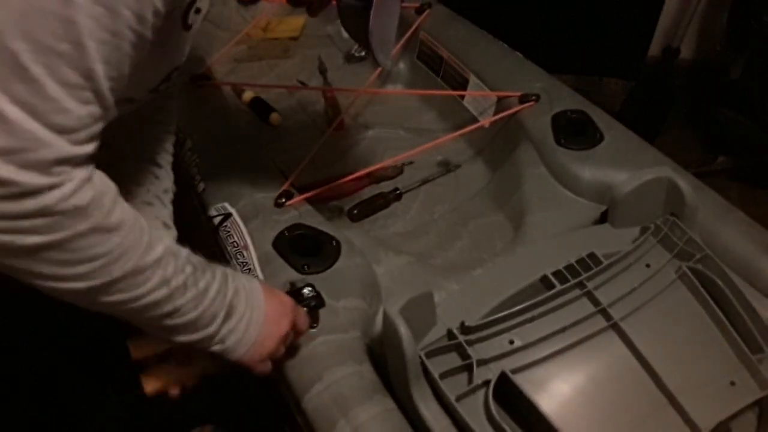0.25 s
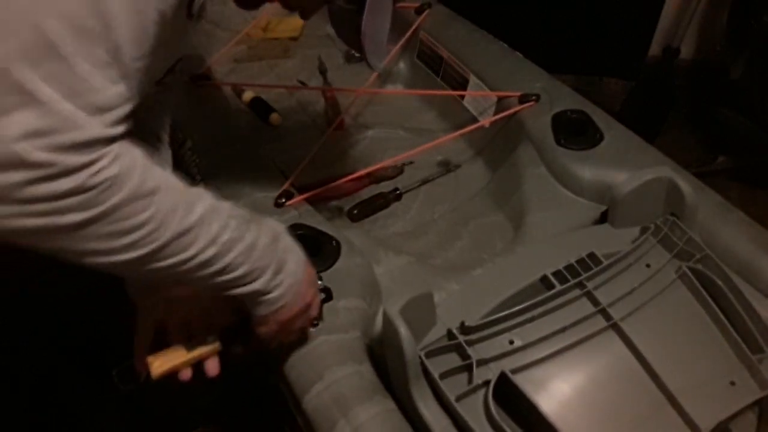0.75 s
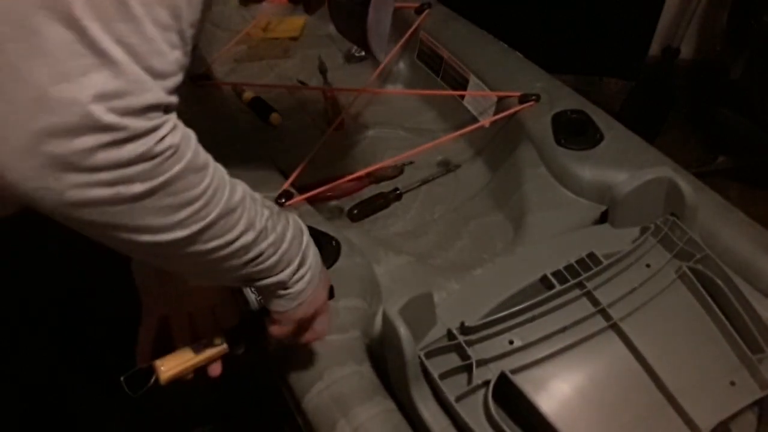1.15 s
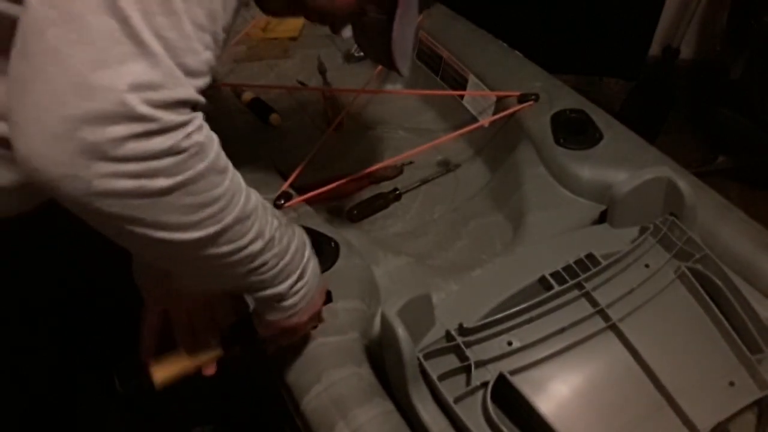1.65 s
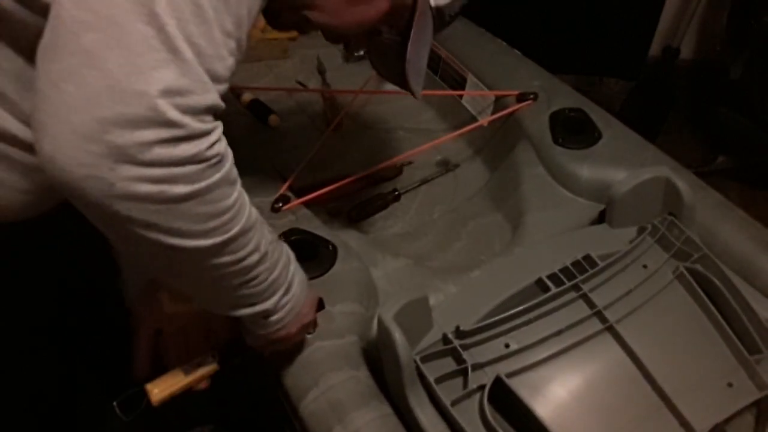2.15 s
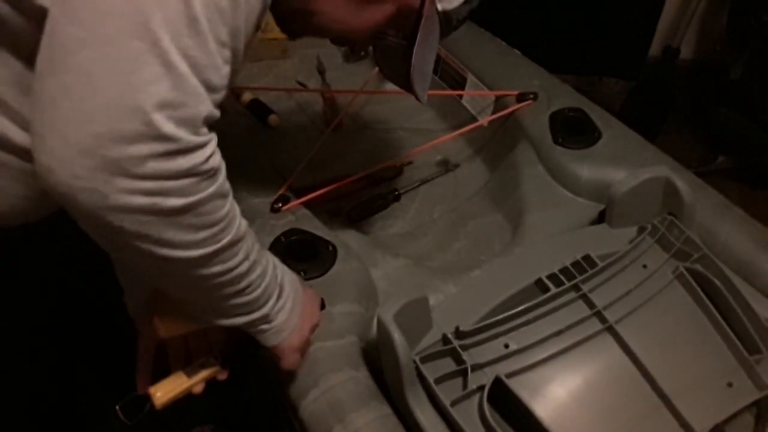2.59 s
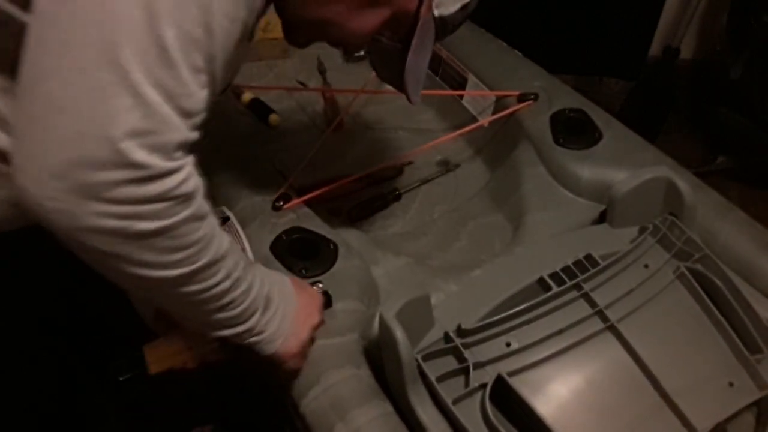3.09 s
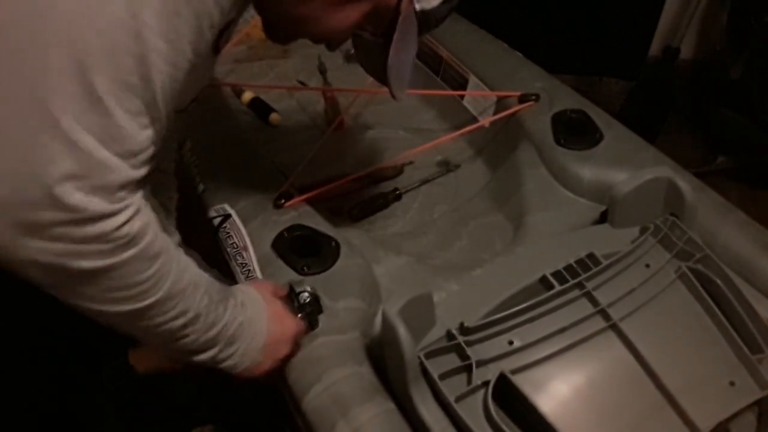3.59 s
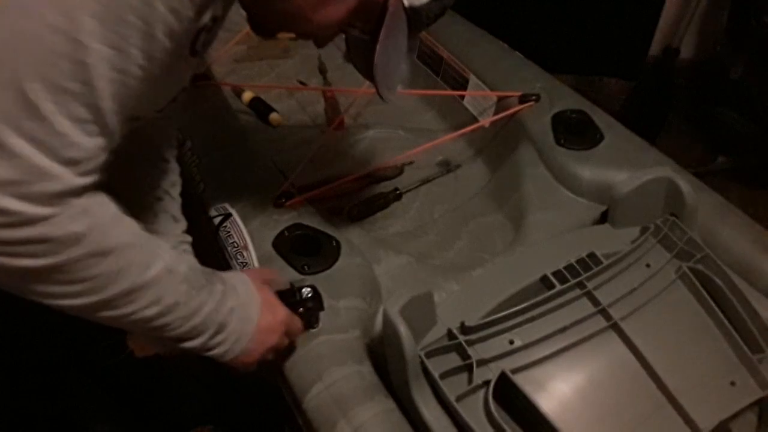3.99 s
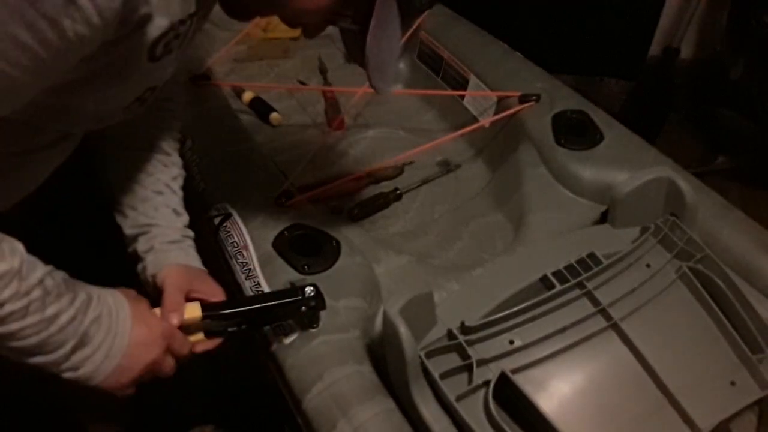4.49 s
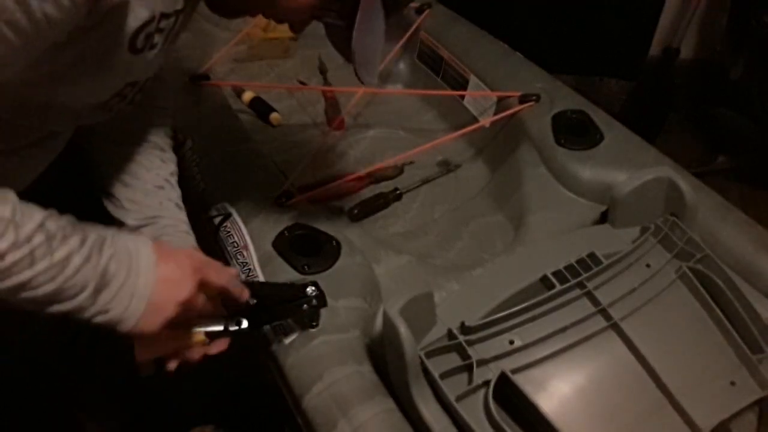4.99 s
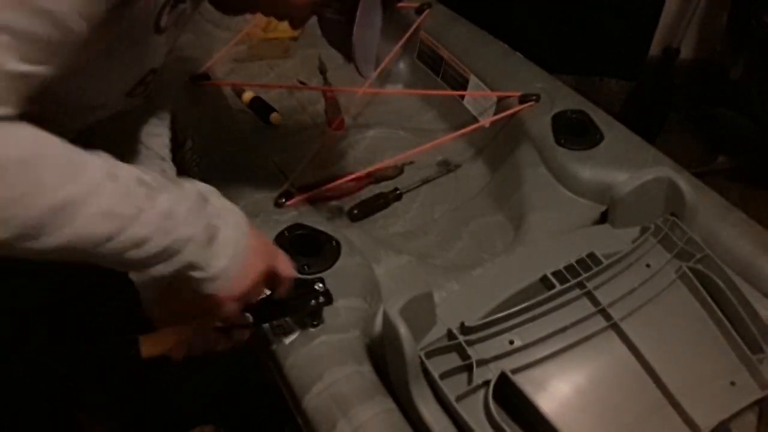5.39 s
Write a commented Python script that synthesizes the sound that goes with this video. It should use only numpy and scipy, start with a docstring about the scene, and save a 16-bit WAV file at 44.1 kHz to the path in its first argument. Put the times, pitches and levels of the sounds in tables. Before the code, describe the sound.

A hand rivet gun clicks, then snaps a rivet with a hollow plastic boom; the steel stem drops and rings amid soft rustles.

```python
"""Hand riveting a plastic kayak hull.

In a small workshop the rivet gun's jaws and handles click, the rivet stem snaps and the hollow hull
booms. Later the spent steel stem drops, rings and bounces. Sleeves rustle over the room's air.
Soft low bumps reach the two microphone ports; the right port is muffled and the electronics hiss."""
import sys
import numpy as np
from scipy import signal
from scipy.fft import rfft, irfft, next_fast_len
from scipy.io import wavfile
from scipy.ndimage import uniform_filter1d, map_coordinates

SR = 44100
rng = np.random.default_rng(int(sys.argv[2]) if len(sys.argv) > 2 else 0)


def output_pcm(signal):
    """Save a mono or channel-first signal as 16-bit PCM at the path in sys.argv[1].

    Samples are clipped to [-1, 1] before scaling.
    """
    pcm = np.clip(np.atleast_2d(signal).T, -1, 1) * 32767
    wavfile.write(sys.argv[1], SR, np.round(pcm).astype(np.int16))


N = 249165
CLOCK_S = np.arange(N) / SR
EVENT_S = np.arange(int(.7 * SR)) / SR

# Room decay: freq_hz, t60_s
ROOM_DECAY = [(100, 0.61), (400, 0.3), (1000, 0.51), (3000, 0.39), (8000, 0.44), (15000, 0.27)]
# Left-right likeness of diffuse sound: freq_hz, correlation
PORT_COHERENCE = [(60, 0.97), (150, 0.84), (300, 0.84), (640, 0.31), (1400, -0.37), (3000, 0.046)]
# Responses of the right port and of both ports: freq_hz, gain_db
RIGHT_MUFFLE = [(100, 1), (400, -4), (700, -2.5), (1300, -12.5), (2400, -13.5), (4400, -20), (8000, -38),
                (15000, -21)]
PORT_LOW_CUT = [(15, -22), (30, -12), (50, -1.5), (70, -0.5)]

# Noise spectra: freq_hz, level_db
HISS_SPECTRUM = [(1000, 11.5), (4000, 3.5), (6000, 0), (11000, 0.5), (13000, 6), (14500, 6.5), (16000, 0.5)]
FIZZ_SPECTRUM = [(5000, -35), (7000, -7), (8300, 3.5), (10000, 0.5), (11500, 0), (12600, -24), (13600, 4),
                 (15500, -10)]
AIR_SPECTRUM = [(30, -11), (100, 1.5), (200, -3), (370, -1.5), (600, -6), (1000, -15.5), (1600, -17.5),
                (2500, -33), (4000, -41), (8000, -51.5)]
RUMBLE_SPECTRUM = [(20, -41), (45, -21.5), (90, 0), (140, -5), (250, -14.5), (500, -43), (1500, -64.5)]
CLOTH_SPECTRUM = [(100, 8.5), (300, 5.5), (700, -4.5), (1500, -9.5), (3000, -27), (8000, -50), (16000, -45)]
# Stronger fizz: start_s, end_s
FIZZ_SPANS = [(.07, .15), (.66, 0.75), (1.23, 1.61), (2.47, 2.93)]
# Stronger rumble: start_s, end_s, boost_db
RUMBLE_FLURRIES = [(.08, 0.93, 6.5), (1.043, 1.956, 9.5), (2.42, 3.023, 9.5), (3.892, 4.09, 6),
                   (4.964, 5.2, 5.5), (5.43, 5.7, 9)]
# Loud low bumps: centre_s, level_db, pitch_hz, port (0 left, 1 right)
LOUD_BUMPS = [(0.118, -16.5, 198, 0), (.84, -19.5, 171, 0), (1.596, -17.5, 160, 0), (2.452, -21.5, 218, 0),
              (2.501, -15, 119, 0), (2.567, -19.5, 144, 0), (2.852, -24, 197, 0), (2.903, -20, 220, 0),
              (2.983, -23, 120, 0), (3.313, -22, 131, 0), (3.539, -27, 119, 1), (4.032, -23, 143, 0),
              (4.601, -24, 129, 0), (5.003, -26.5, 139, 0), (5.455, -20, 148, 0)]
# Sleeve swells: centre_s, level_db, half_length_s
SLEEVE_RUSTLES = [(0.164, -46.5, 0.044), (0.853, -55, 0.033), (2.427, -55, 0.26), (2.878, -46, 0.034),
                  (4.427, -55.5, 0.24), (5.076, -50, 0.087), (5.538, -52.5, 0.073)]

# Impact spectra: freq_hz, level_db
THUD_SPECTRUM = [(30, -44), (60, -31), (90, -11.5), (170, -7), (260, -1.5), (350, 1.5), (520, 0), (640, -9),
                 (760, -9.5), (900, -21.5), (2000, -49), (6000, -84)]
CRACK_SPECTRUM = [(200, -13), (700, 3.5), (1200, 7), (2400, 2.5), (3400, -2.5), (4800, -4.5), (6500, -12.5),
                  (8000, -9.5), (10000, -21), (16000, -20.5)]
TICK_SPECTRUM = [(300, -11), (1000, 1), (1600, -1.5), (3000, -9), (4000, -2), (7500, -8.5), (9000, -9),
                 (13000, -22), (16000, -4)]
LANDING_SPECTRUM = [(200, 3), (700, -12.5), (1400, 8), (2700, 0), (4500, 0), (8500, -1), (11000, -8),
                    (16000, -1.5)]
# Resonances of jaws, handles, gun nose on hull and landing surface: freq_hz, energy_db, t60_s
JAW_MODES = [(1515, -0.5, 0.02), (2100, 4.5, 0.022), (2260, 0.5, 0.0091), (2690, -1.5, 0.015),
             (3010, 0.5, 0.012), (3440, -10, 0.0065), (4610, -1, .012), (5090, -1, 0.025),
             (5780, -0.5, 0.0051), (7150, 3, 0.0067), (7700, 1, 0.01), (8340, -2.5, 0.0067),
             (12500, -9.5, .008)]
HANDLE_MODES = [(1480, -11, 0.037), (1610, -9.5, 0.045), (2061, 1, 0.04), (2118, -3, 0.035),
                (3050, -15.5, 0.0099), (4010, -20.5, 0.021), (7660, -28.5, 0.012)]
NOSE_MODES = [(810, 3, 0.01), (1045, -2, 0.013), (1479, -0.5, 0.032), (1664, -0.5, 0.018),
              (1950, -3.5, 0.013), (2225, -6.5, 0.049), (2770, -8.5, 0.0063), (3130, -5.5, 0.015),
              (3484, -14.5, 0.03)]
SURFACE_MODES = [(823, -3.5, 0.022), (987, 3.5, 0.025), (1350, 7.5, 0.0052), (1680, 4.5, 0.013),
                 (2500, 0.5, 0.011), (2910, 2, 0.0095), (4420, -4.5, 0.0076), (4830, -6.5, 0.0066)]
# Jaws release the stem or slip on it: start_s, level_db, tilt_db_per_octave
JAW_SLIPS = [(0.465, -57, 10), (1.0468, -39, -0.5), (1.313, -57.5, 10), (4.013, -58.5, 5),
             (4.9117, -56.5, -8.5), (5.2739, -63, -6)]
# Handles reach their stops: start_s, level_db, tilt_db_per_octave
HANDLE_STOPS = [(.4643, -60.5, -13), (2.364, -57, -4), (4.7975, -36, 2.5)]
# Nose shifts against the hull: start_s, clack_db, tilt_db_per_octave, thud_db
NOSE_SHIFTS = [(0.1372, -50, -6, -43), (2.3437, -54, -4, -64), (2.465, -51, -6.5, -57),
               (2.894, -38.5, 0.5, -42.5), (2.912, -40, -2.5, -41), (4.37, -51.5, -5, -73),
               (5.0638, -62, -5, -72)]

# Steel stem resonances: freq_hz, struck_at_tip_db, struck_at_middle_db, t60_s
STEM_MODES = [(2374, -17, -16, .28), (4183, -18, -17, .22), (5891, -14, -5, .33), (8565, -19, -20, .28),
              (9868, -1, -12, .32), (12020, -22, -8, .19), (13484, -1, 0, .2)]
# Stem landings: start_s, clack_db, tick_db, ring_db, strike_point (0 tip, 1 middle)
STEM_LANDINGS = [(3.0074, -29.5, -33.5, -37, 0.29), (3.021, -46, -43, -42, 0.2),
                 (3.051, -48, -38.5, -47, 0.8), (3.0924, -35.5, -34, -34.5, 1)]
# Stem gives, breaks, gun recoils: start_s, thud_db, clack_db, crack_db, first_gap_s, rebound_loss_db
SNAP_JOLTS = [(1.6636, -22.5, -44.5, -48.5, .009, 5), (1.692, -11.5, -19.5, -27, 0.0084, 2.5),
              (1.735, -12.5, -26.5, -22.5, .013, 8.5)]
# Hollow hull resonances: freq_hz, level_db, t60_s, swell_s
HULL_MODES = [(92, -34, .7, .06), (129, -16.5, .36, .02), (146, -28, .45, .05), (212, -21, .33, .03),
              (252, -15, .22, .03), (305, -16, .3, .025), (350, -4, .19, .016), (393, -9, .23, .03),
              (419, -10, .23, .03), (521, -1, .25, .06), (549, -14, .25, .04), (611, -23, .27, .03),
              (659, -22, .28, .03), (745, -21, .32, .04), (865, -34, .45, .04), (1164, -30, .3, .025),
              (1503, -23, .3, .025), (1873, -26, .22, .05)]
# Hull springs as the stem gives and breaks: start_s, level_db
HULL_BOOMS = [(1.661, -13.5), (1.6917, 0)]


def amp(db):
    """Decibels to gain."""
    return 10 ** (np.asarray(db) / 20)


def unit_rms(x):
    """Scale to rms 1."""
    return x / np.sqrt(np.mean(x ** 2) + 1e-20)


def unit_burst(x):
    """Scale to the energy of 10 ms at rms 1."""
    return x / np.linalg.norm(x) * np.sqrt(SR / 100)


def curve_at(points, hz):
    """Interpolate on a log frequency axis."""
    knots_hz, values = np.transpose(points)
    return np.interp(np.log(hz + 1), np.log(knots_hz + 1), values)


def add(track, start_s, x):
    """Mix x into the track."""
    start = max(round(start_s * SR), 0)
    track[..., start:start + x.shape[-1]] += x[..., :N - start]


def colour(x, spectrum):
    """Filter by a (freq_hz, gain_db) curve."""
    size = next_fast_len(x.shape[-1] + 8192)
    gain = amp(curve_at(spectrum, np.fft.rfftfreq(size, 1 / SR)))
    return irfft(rfft(x, size) * gain, size)[..., :x.shape[-1]]


def gate(start_s, end_s, ramp_s):
    """Trapezoid from 0 to 1 and back."""
    return np.clip(np.minimum(CLOCK_S - start_s, end_s - CLOCK_S) / ramp_s + .5, 0, 1)


def wobble(knots_per_s):
    """Smooth random curve."""
    return map_coordinates(rng.standard_normal(256), [EVENT_S * knots_per_s], mode="mirror")


def diffuse_noise(size):
    """Noise from all around: alike at both ports in the bass, unrelated in the treble."""
    coherence = curve_at(PORT_COHERENCE, np.fft.rfftfreq(size, 1 / SR))
    angle = np.arccos(np.clip(coherence, -1, 1)) / 2
    mid, side = irfft(rfft(rng.standard_normal((2, size))) * [np.cos(angle), np.sin(angle)], size)
    return np.array([mid + side, mid - side])


def impact(spectrum, size=4096):
    """Minimum-phase pulse with the given spectrum."""
    cepstrum = irfft(np.log(amp(curve_at(spectrum, np.fft.rfftfreq(size, 1 / SR)))))
    cepstrum[1:size // 2] *= 2
    cepstrum[size // 2 + 1:] = 0
    pulse = irfft(np.exp(rfft(cepstrum)))
    return unit_burst(np.pad(pulse, (0, len(EVENT_S) - size)))


def ring(hz, t60_s):
    """One decaying mode."""
    return np.sin(2 * np.pi * hz * EVENT_S) * amp(-60 * EVENT_S / t60_s)


def struck(modes, tilt_db_per_octave=0):
    """Short resonances excited together, alternating in sign."""
    return unit_burst(sum(
        (-1) ** k * amp(db + tilt_db_per_octave * np.log2(hz / SR)) * ring(hz, t60_s) / np.sqrt(t60_s)
        for k, (hz, db, t60_s) in enumerate(modes)))


def in_room(x, wet_db, t60_scale=1, build_s=.0013):
    """Direct sound, then a dense tail from hull and walls."""
    hz, time_s, noise = signal.stft(diffuse_noise(len(EVENT_S)), SR, nperseg=256)
    decay = amp(-60 * time_s / (t60_scale * curve_at(ROOM_DECAY, hz)[:, None]))
    response = signal.istft(noise * decay, SR, nperseg=256)[1][:, :len(EVENT_S)]
    response *= 1 - np.exp(-EVENT_S / build_s)
    response *= amp(wet_db) / np.linalg.norm(response[0])
    response[0, 0] += 1
    response[1, 3] += 1  # direct sound, 3 samples later on the right
    return signal.fftconvolve(x[None], response, axes=1) / np.hypot(1, amp(wet_db))


def microphone_hiss(hiss_db=-72, fizz_db=-71, step_db=4):
    """Even electronic hiss, plus a high fizz on the left that steps up in spells."""
    hiss = amp(hiss_db) * unit_rms(colour(rng.standard_normal((2, N)), HISS_SPECTRUM))
    spells = sum(gate(start_s, end_s, ramp_s=.03) for start_s, end_s in FIZZ_SPANS)
    fizz = unit_rms(colour(rng.standard_normal(N), FIZZ_SPECTRUM))
    hiss[0] += amp(fizz_db + step_db * spells) * fizz
    return hiss


def room_air(level_db=-51):
    """Steady diffuse murmur of air."""
    return amp(level_db) * unit_rms(colour(diffuse_noise(N), AIR_SPECTRUM))


def port_bumps(calm_db=-57.5, lump_db=4, small_count=44, small_hz=129, width_cycles=.41, lead_s=.03):
    """Brief pressure swings at either port over a lumpy rumble; flurries lift rumble and small bumps."""
    flurry_db = sum(db * gate(start_s, end_s, ramp_s=.047) for start_s, end_s, db in RUMBLE_FLURRIES)
    bed_db = calm_db + flurry_db
    slow_noise = colour(rng.standard_normal((2, N)), [(1, -1), (25, 12.5), (70, -49), (200, -120)])
    lumps = amp(lump_db * unit_rms(slow_noise))
    rumble = unit_rms(lumps * colour(rng.standard_normal((2, N)), RUMBLE_SPECTRUM))
    out = rumble * amp(bed_db) * amp([[5], [1]])  # louder on the left
    trailing = [(centre_s + .022 * rng.uniform(.475, 1.51), db - 8, hz, port)
                for centre_s, db, hz, port in LOUD_BUMPS]
    small = []
    for k, (when, size, pitch, side) in enumerate(rng.random((small_count, 4))):
        centre_s = (k + when) / small_count * N / SR
        db = np.interp(centre_s, CLOCK_S, bed_db) + 17.5 + 7.5 * (size - .5)
        small.append((centre_s, db, small_hz * 2 ** (pitch - .5), side > .7))  # 70% left
    for centre_s, db, hz, port in LOUD_BUMPS + trailing + small:
        cycles = (EVENT_S - lead_s) * hz
        swing = np.cos(2 * np.pi * (cycles + rng.random()))
        envelope = (1 + (cycles / width_cycles) ** 2) ** -1.27
        add(out[int(port)], centre_s - lead_s, amp(db) * envelope * swing)
    return out


def sleeves(grain_db=1.8):
    """Cloth slides in short grainy swells."""
    envelope = sum(amp(db) * np.exp(-((CLOCK_S - centre_s) / half_s) ** 2)
                   for centre_s, db, half_s in SLEEVE_RUSTLES)
    grain = amp(grain_db * unit_rms(uniform_filter1d(rng.standard_normal(N), size=200)))
    return envelope * unit_rms(grain * colour(diffuse_noise(N), CLOTH_SPECTRUM))


def gun_clicks():
    """Jaws and handles tick and ring; the nose also knocks the hull."""
    out = np.zeros((2, N))
    tick, thud = impact(TICK_SPECTRUM), impact(THUD_SPECTRUM)
    for start_s, db, tilt in JAW_SLIPS:
        click = struck(JAW_MODES, tilt) + amp(-14.5) * tick
        add(out, start_s, amp(db) * in_room(click, wet_db=4, t60_scale=.85))
    for start_s, db, tilt in HANDLE_STOPS:
        click = struck(HANDLE_MODES, tilt) + amp(-14) * tick
        add(out, start_s, amp(db) * in_room(click, wet_db=2, t60_scale=.75))
    for start_s, clack_db, tilt, thud_db in NOSE_SHIFTS:
        clack = struck(NOSE_MODES, tilt) + amp(-12) * tick
        knock = amp(clack_db) * clack + amp(thud_db) * thud
        add(out, start_s, in_room(knock, wet_db=5, t60_scale=.91))
    return out


def stem_drop(flutter_db=5.5, swell_s=.0034):
    """The stem bounces; the strike point weights its modes, which flutter as it tumbles."""
    out = np.zeros((2, N))
    for start_s, clack_db, tick_db, ring_db, strike_point in STEM_LANDINGS:
        steel = np.zeros_like(EVENT_S)
        for hz, tip_db, middle_db, t60_s in STEM_MODES:
            mode_db = np.interp(strike_point, [0, 1], [tip_db, middle_db])
            steel += amp(mode_db + flutter_db * wobble(knots_per_s=70)) * ring(hz, t60_s)
        steel *= 1 - np.exp(-EVENT_S / swell_s)
        add(out, start_s, amp(ring_db) * in_room(steel, wet_db=-5))
        contact = amp(clack_db) * struck(SURFACE_MODES) + amp(tick_db) * impact(LANDING_SPECTRUM)
        add(out, start_s, in_room(contact, wet_db=4.5))
    return out


def rivet_snap(rebounds=3, gap_growth=1.12, dulling_db=3):
    """The stem gives and breaks in jolts; each rebound is later, weaker and duller."""
    out = np.zeros((2, N))
    thud, clack, crack = impact(THUD_SPECTRUM), struck(NOSE_MODES), impact(CRACK_SPECTRUM)
    for start_s, thud_db, clack_db, crack_db, gap_s, loss_db in SNAP_JOLTS:
        for k in range(rebounds + 1):
            strength = amp(-loss_db * k)
            add(out, start_s, strength * amp(thud_db) * in_room(thud, wet_db=8.5, t60_scale=.93))
            snap = amp(clack_db) * clack + amp(crack_db - dulling_db * k) * crack
            add(out, start_s, strength * in_room(snap, wet_db=6.5, t60_scale=.82))
            start_s += gap_s * gap_growth ** k
    return out


def hull_boom():
    """The blow spreads through the hollow hull; its modes swell, then decay."""
    out = np.zeros((2, N))
    boom = sum(amp(db) * ring(hz, t60_s) * (1 - np.exp(-(EVENT_S / swell_s) ** 2))
               for hz, db, t60_s, swell_s in HULL_MODES)
    for start_s, db in HULL_BOOMS:
        add(out, start_s, amp(db) * in_room(boom, wet_db=-26))
    return out


def scene():
    """Work and room at the two ports."""
    return rivet_snap() + hull_boom() + gun_clicks() + stem_drop() + sleeves() + room_air() + port_bumps()


def record(dry):
    """Muffled right port, low cut on both, then hiss and band limit from the electronics."""
    ports = np.array([dry[0], colour(dry[1], RIGHT_MUFFLE)])
    heard = colour(ports, PORT_LOW_CUT) + microphone_hiss()
    size = next_fast_len(N + 8192)
    passband = np.fft.rfftfreq(size, 1 / SR) < 15900
    return irfft(rfft(heard, size) * passband, size)[:, :N]


dry = scene()
out = record(dry)
output_pcm(out)
```